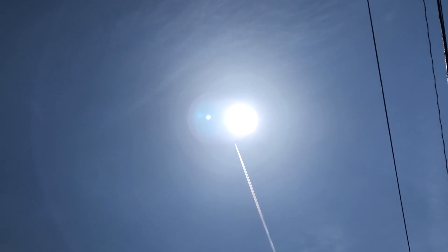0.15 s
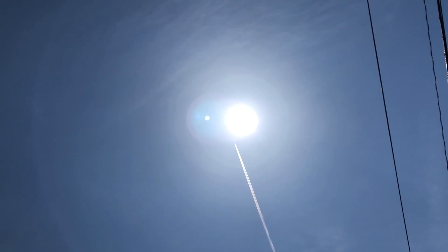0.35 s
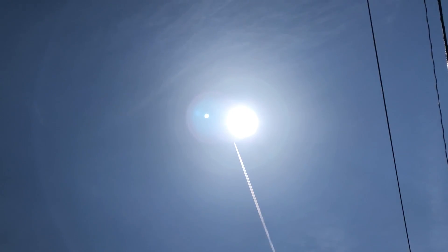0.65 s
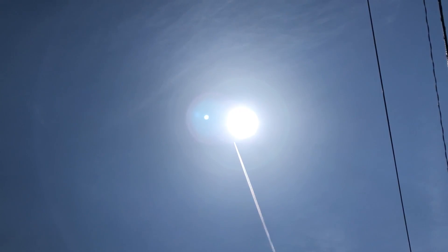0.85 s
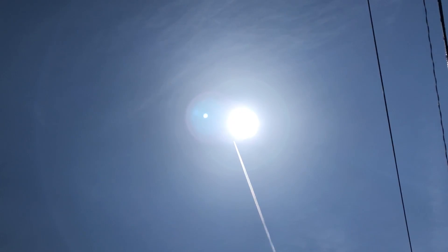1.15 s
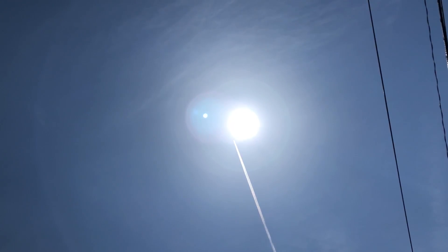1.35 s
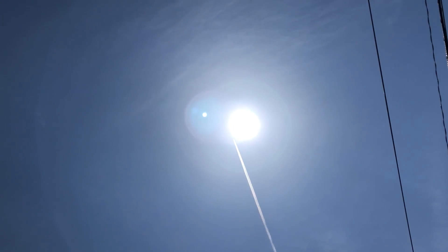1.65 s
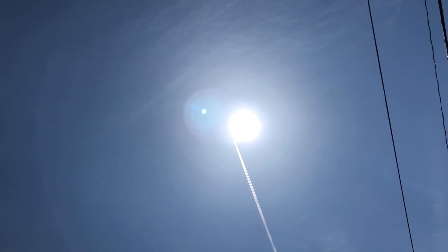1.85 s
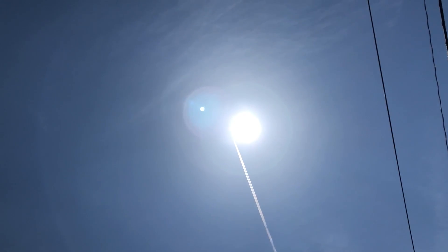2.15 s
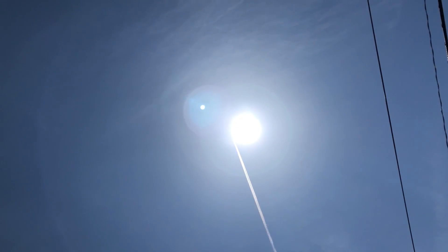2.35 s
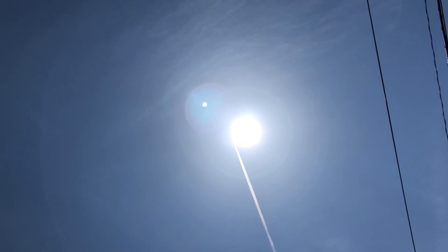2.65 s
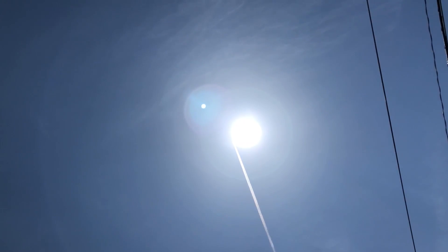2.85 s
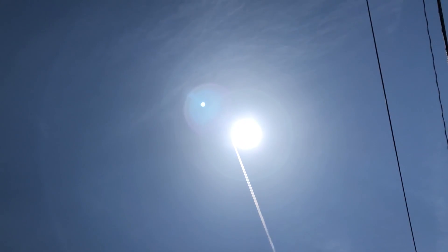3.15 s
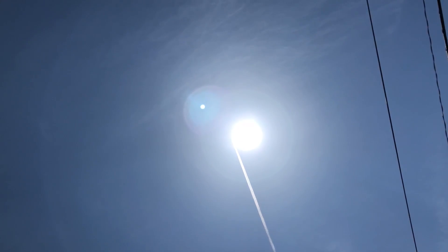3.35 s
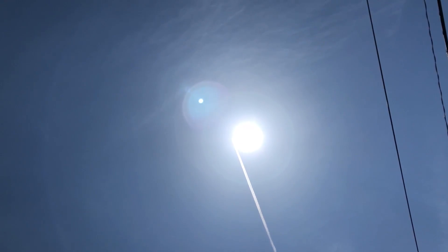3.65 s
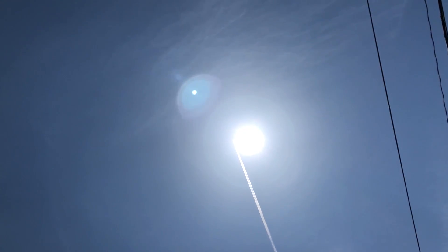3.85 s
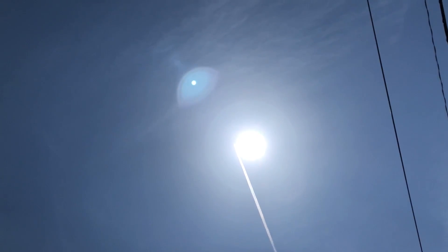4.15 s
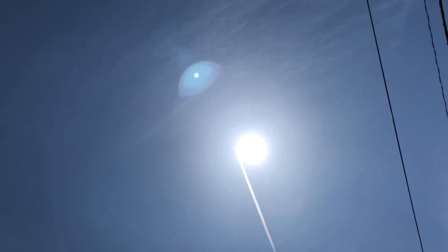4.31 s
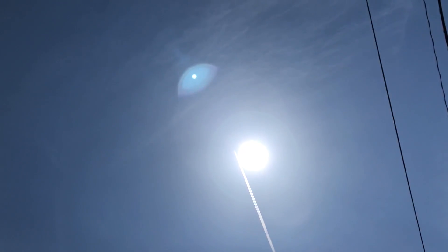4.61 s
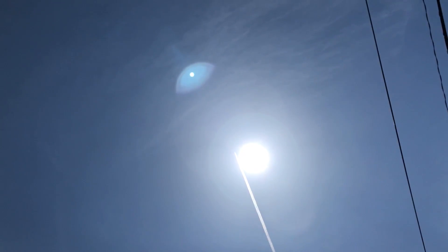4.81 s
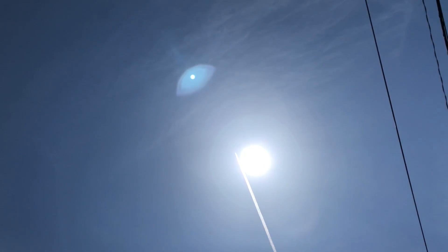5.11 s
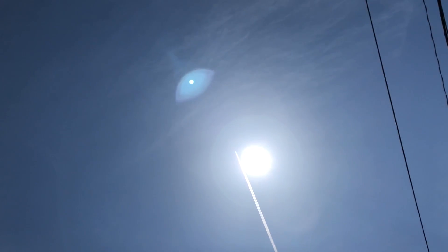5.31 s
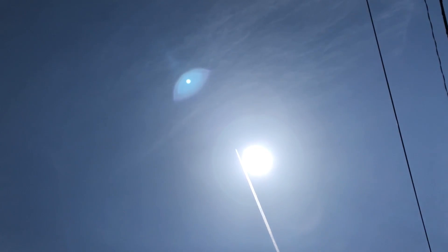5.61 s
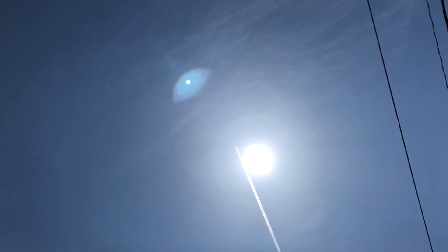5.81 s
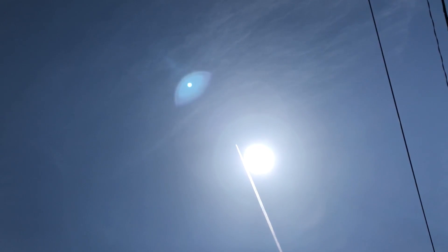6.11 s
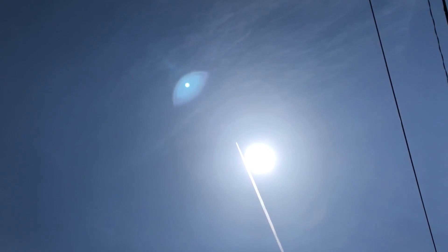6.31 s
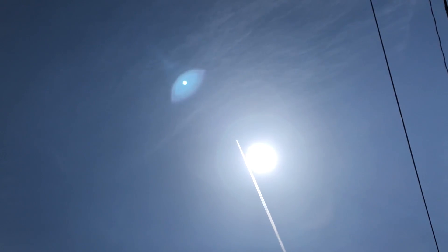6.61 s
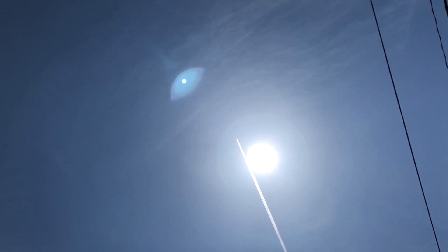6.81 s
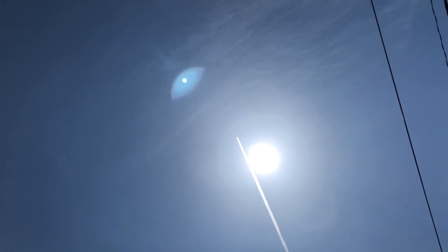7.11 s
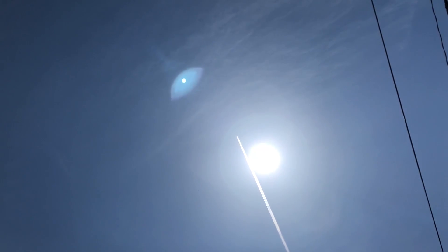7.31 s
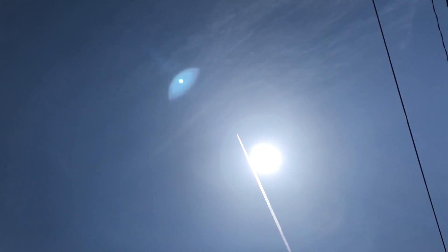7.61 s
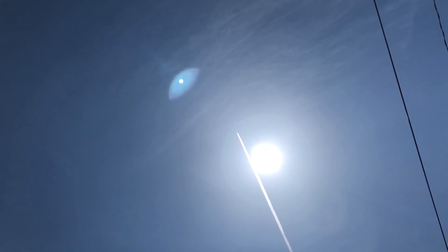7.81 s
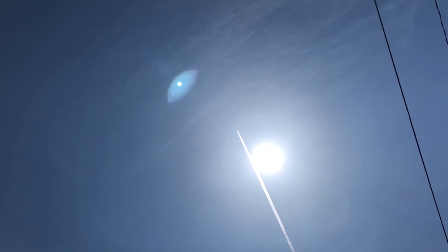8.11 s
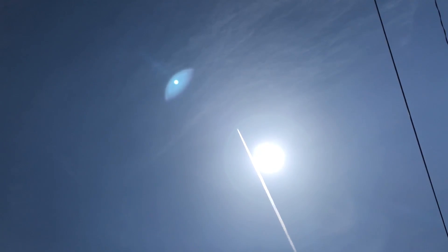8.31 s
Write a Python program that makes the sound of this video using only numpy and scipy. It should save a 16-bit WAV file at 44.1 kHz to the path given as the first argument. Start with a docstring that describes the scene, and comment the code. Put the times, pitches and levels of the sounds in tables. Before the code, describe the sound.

Six spaced raspy alarm barks ring through trees over soft leaf hush, faint bird whistles, and a far engine drone growing louder.

```python
"""Alarm barks among trees

A monkey gives six barks: in each, a tonal squeal with rising pitch breaks into throat-filtered noise, the rasp.
Small birds whistle and twitter on gliding sine tones; trees return bark and song as decaying scattered noise.
A distant engine, a sum of harmonics of its firing rate, speeds up, slackens, then speeds up again and swells.
Filtered noise makes the far murmur, the hush of leaves and the light breeze that nudges the microphone.
"""
import sys
import numpy as np
from scipy import signal
from scipy.fft import rfft, irfft, next_fast_len
from scipy.io import wavfile
from scipy.ndimage import uniform_filter1d, map_coordinates

SR = 44100
rng = np.random.default_rng(int(sys.argv[2]) if len(sys.argv) > 2 else 0)


def dump_mix(stems):
    """Bounce the given channels to the path in sys.argv[1] as a 16-bit WAV at rate SR."""
    frames = np.atleast_2d(stems).T  # one column per channel
    limited = np.clip(frames, -1, 1)  # hard clip at full scale
    pcm = np.round(limited * 32767).astype(np.int16)
    wavfile.write(sys.argv[1], SR, pcm)


N = 373086  # length in samples


def amp(db):
    """Decibels are logarithmic: 20 dB is a factor of ten in amplitude."""
    return 10 ** (np.asarray(db) / 20)


def unit(x):
    """Normalisation to an rms of 1."""
    return x / np.sqrt(np.mean(x ** 2) + 1e-20)


def along(points, hz):
    """Linear interpolation of (hz, value) points on a logarithmic frequency axis."""
    f, v = np.transpose(points)
    return np.interp(np.log(hz + 1), np.log(f + 1), v)


def curves(rows, t):
    """Linear interpolation in time of each column after the first."""
    s, *columns = np.transpose(rows)
    return [np.interp(t, s, column) for column in columns]


def wobble(rate, size):
    """Band-limited random modulation: a spline through rate normal random knots a second."""
    knots = rng.standard_normal(int(size * rate / SR) + 4)
    return map_coordinates(knots, [np.arange(size) * rate / SR])


def filtered(x, response):
    """Linear filtering as multiplication of the spectrum by a response of frequency."""
    m = next_fast_len(len(x) + 8192)
    spectrum = rfft(x, m) * response(np.fft.rfftfreq(m, 1 / SR))
    return irfft(spectrum, m)[:len(x)]


def noise(spectrum):
    """White noise shaped by a spectral density, at an rms of 1."""
    white = rng.standard_normal(N)
    return unit(filtered(white, lambda hz: amp(along(spectrum, hz))))


def phase_of(hz):
    """Phase is the running integral of instantaneous frequency."""
    return 2 * np.pi * np.cumsum(hz) / SR


def add(track, s, sound):
    """Superposition: sound sums into the track from time s on."""
    start = round(s * SR)
    part = sound[max(-start, 0):N - start]
    track[max(start, 0):][:len(part)] += part


def ramp(t, start, length):
    """Linear transition from 0 to 1 over length, beginning at start."""
    return np.clip((t - start) / max(length, 1e-4), 0, 1)


def span(length):
    """Normalised time 0-1 through a note, one value per sample."""
    return np.linspace(0, 1, int(length * SR))


def air(split_hz=950, murmur_db=2, leaves_db=-63.5):
    """Broadband ambience split into bands: a far murmur and the hush of leaves drift slowly in level."""
    # hush spectrum: hz, relative_db_per_hz
    hush_spectrum = [(120, -13.5), (200, 1.5), (293, 1), (327, -3), (393, -3.5), (535, -5.5), (619, -7.5),
                     (942, -7.5), (1110, -7.5), (1220, -8), (2860, -20), (4350, -25.5), (4950, -27.5),
                     (7390, -33.5), (15600, -42.5)]
    # murmur level before the offset murmur_db: time_s, level_db
    murmur_level = [(0, -64.5), (2.3, -62.5), (4.5, -63.5), (5.3, -64), (7.1, -58), (8.46, -60.5)]
    low_db, = curves(murmur_level, np.arange(N) / SR)
    hush = noise(hush_spectrum)
    low = filtered(hush, lambda hz: 1 / (1 + (hz / split_hz) ** 4))
    hiss = filtered(hush, lambda hz: 1 - 1 / (1 + (hz / 4200) ** 4))
    middle = hush - low - hiss
    murmur = amp(low_db + murmur_db + 0.25 * wobble(5.5, N)) * unit(low)
    leaves = amp(leaves_db + 0.46 * wobble(2.9, N)) * unit(middle)
    even_hiss = amp(-75.0) * unit(hiss)  # the finest hiss holds its level
    return murmur + leaves + even_hiss


def breeze(lump_db=2.5, puff_width_s=0.0063):
    """Turbulent pressure at the microphone: low-frequency noise in lumps, with a few short puffs."""
    # mean level of the breeze: time_s, level_db
    breeze_level = [(0, -59.5), (2, -58), (2.7, -60), (5, -64), (6.5, -55.5), (8.46, -52.5)]
    # spectrum of the buffeting: hz, relative_db_per_hz
    buffet_spectrum = [(15, -49), (35, -10.5), (60, 6), (110, 4), (170, 0.5), (260, -22), (450, -34),
                       (900, -76)]
    # soft thumps of air: centre_s, level_db
    thumps = [(.51, -63), (1.01, -68), (1.63, -54), (2.58, -58), (6.3, -51), (6.51, -45), (6.6, -41),
              (7.13, -37.5)]
    t = np.arange(N) / SR
    level_db, = curves(breeze_level, t)
    # each puff has a Gaussian envelope whose standard deviation is puff_width_s
    puffs = sum(amp(db) * np.exp(-.5 * ((t - s) / puff_width_s) ** 2) for s, db in thumps)
    lumps = amp(level_db + lump_db * wobble(11, N))
    return (lumps + puffs) * noise(buffet_spectrum)


def engine(drone_db=-2.0, flutter_db=3.0, wash_db=-33, waver_db=3, count=8):
    """Periodic exhaust pulses as harmonics of the firing rate, each fading on its own, with a faint noise wash."""
    # firing rate, the fundamental: time_s, rate_hz
    firing_rate = [(0, 69), (.5, 69.5), (1, 75), (1.6, 80), (2.15, 83.3), (2.6, 82), (3, 76.5), (3.5, 69.5),
                   (4, 64.5), (4.5, 62), (5, 61), (5.5, 60.8), (5.9, 62.2), (6.4, 66.5), (7, 72.2),
                   (7.5, 77), (8, 82.2), (8.46, 87.3)]
    # fundamental before the offset drone_db: time_s, level_db
    drone_level = [(0.0, -62), (0.12, -56.5), (1.48, -59), (1.51, -48), (2.0, -68), (2.09, -56),
                   (2.54, -59.5), (2.59, -47), (2.9, -60), (3.3, -46.5), (3.37, -54.5), (4.0, -44),
                   (5.14, -65), (5.2, -54), (5.51, -50.5), (5.61, -57), (6.27, -38.5), (6.39, -43.5),
                   (6.5, -36), (7.44, -32), (7.59, -40), (7.66, -32.5), (8.13, -28.5), (8.44, -30),
                   (8.46, -31)]
    # harmonics, the upper ones before the muffler: time_s, second_order_db, upper_orders_db
    exhaust = [(0, -60, -68), (1, -64.5, -70), (2.2, -65.5, -59.5), (3, -67, -78), (3.8, -64.5, -71),
               (4.8, -68, -70.5), (5.8, -65, -71), (6.2, -51, -74), (6.7, -53.5, -78), (7, -47.5, -65),
               (7.6, -48.5, -64), (7.95, -46, -56), (8.2, -54, -56.5), (8.46, -65, -52.5)]
    # muffler's colouring of the upper orders: hz, gain_db
    muffler = [(180, -15), (230, -0.5), (260, -11.5), (300, -17), (380, -8.5), (425, -10), (500, -18.5),
               (600, -13), (800, -34)]
    # spectrum of the wash: hz, relative_db_per_hz
    wash_spectrum = [(200, -37), (450, -15), (750, 1.5), (1300, 6), (2000, -13), (3500, -20), (7000, -47)]
    t = np.arange(N) / SR
    firing, = curves(firing_rate, t)
    base_db, = curves(drone_level, t)
    second_db, upper_db = curves(exhaust, t)
    phase = phase_of(firing * (1 + .003 * wobble(12, N)))

    faintness = (base_db.max() - base_db) / np.ptp(base_db)  # the fainter the drone, the more it wavers
    fundamental = amp(base_db + drone_db + waver_db * faintness * wobble(12, N)) * np.sin(phase)
    second = amp(second_db + wobble(6.3, N)) * np.sin(2 * phase)
    upper = np.zeros(N)
    for k in range(3, count + 1):
        order_db = upper_db + along(muffler, k * firing) + flutter_db * wobble(7, N)
        upper += amp(order_db) * np.sin(k * phase)

    nearness = uniform_filter1d(amp(base_db), SR)  # a 1 s average: the wash follows the slow swell only
    wash = amp(wash_db) * nearness * noise(wash_spectrum)
    return np.sqrt(2) * (fundamental + second + upper) + wash


def note(arch, db, buzz, buzz_hz=190, buzz_depth=0.051, waver=0.0047, fade_s=0.0058,
         flutter_db=2.0, swell_db=3):
    """Frequency modulation of a sine along a pitch arch, loudest in the middle; buzz widens a fast trill."""
    size = len(arch)
    trill = np.sin(phase_of(buzz_hz * (1 + 0.21 * wobble(101, size))))
    pitch = arch * (1 + buzz * buzz_depth * trill + waver * wobble(280, size))
    bulge = np.sin(np.linspace(0, np.pi, size)) - .5
    swell = amp(db + swell_db * bulge + flutter_db * wobble(74, size))
    edges = signal.windows.tukey(size, min(1, 2 * fade_s * SR / size))
    return np.sqrt(2) * swell * edges * np.sin(phase_of(pitch))


def ease(u):
    """Sinusoidal easing: 0 to 1 with zero slope at both ends."""
    return np.sin(np.pi / 2 * u) ** 2


def twitters(chip_buzz=0.56):
    """Rapid descending glides: each twitter is three overlapping chips stepping down in pitch."""
    # twitters: start_s, level_db
    calls = [(.12, -57), (.249, -58), (5.692, -60), (5.817, -62.5)]
    # chips of every twitter: delay_s, length_s, start_hz, end_hz, level_re_twitter_db
    chips = [(0, .032, 8050, 7200, -11.5), (0.017, .027, 5270, 4440, -4.5), (0.046, .03, 4200, 3400, -0.5)]
    out = np.zeros(N)
    for s, db in calls:
        for delay, length, first, last, chip_db in chips:
            glide = first + (last - first) * span(length)
            add(out, s + delay, note(glide, db + chip_db, chip_buzz))
    return out


def buzzy_falls(trill_width=1.17):
    """Fast frequency modulation heard as a buzz, on a pitch that flicks up and then falls; it closes each song."""
    # falls: start_s, length_s, top_hz, level_db (at the start of the loss)
    falls = [(0.368, 0.19, 5170, -58.5), (2.437, 0.19, 5970, -73), (5.941, .185, 5250, -61)]
    rise_s, start_ratio = .016, .72  # upward flick: its length, start pitch over top pitch
    fall_ratio, fade_db = .57, 6  # end pitch over top pitch, loss on the way down
    out = np.zeros(N)
    for s, length, top, db in falls:
        u = span(length)
        flick = start_ratio + (1 - start_ratio) * ramp(u * length, 0, rise_s)
        fall = 1 - (1 - fall_ratio) * ease(u ** 1.15)
        add(out, s, note(top * flick * fall, db - fade_db * u, trill_width))
    return out


def whistles(whistle_buzz=.12):
    """Near-pure tones with gliding frequency: each slows into a turning pitch and eases away from it."""
    # whistles: start_s, length_s, start_hz, turning_hz, end_hz, share_before_turn (0-1), level_db
    calls = [(-.012, .08, 4970, 3870, 3880, .98, -52), (0.745, 0.056, 6400, 4800, 4830, 0.85, -68.5),
             (0.86, 0.055, 6550, 4710, 4800, 0.86, -69), (.956, .039, 3450, 3450, 2880, 0.2, -70),
             (.998, 0.02, 4950, 4900, 4350, 0.1, -72), (1.058, .028, 3520, 3480, 2920, .15, -72),
             (2.304, 0.15, 6170, 7350, 6200, 0.66, -80), (2.855, 0.11, 5200, 6900, 7000, .85, -80),
             (3.069, 0.061, 3700, 4380, 4020, .6, -71.5), (3.727, .096, 6460, 6300, 5600, 0.36, -83),
             (3.831, 0.092, 4100, 5140, 4480, 0.35, -71.5), (4.28, .08, 4100, 4260, 4270, .8, -79),
             (4.832, .084, 6260, 6100, 5780, .3, -79), (4.975, 0.081, 3480, 4290, 3700, 0.6, -57.5),
             (5.236, .045, 5100, 4040, 4000, 0.8, -59), (5.294, .128, 3500, 4890, 4944, 0.3, -56.5),
             (5.503, 0.13, 4200, 4830, 3900, 0.3, -56), (6.565, .06, 5950, 6050, 5600, .4, -81),
             (6.618, 0.073, 5600, 4320, 5100, .45, -74), (6.69, 0.11, 4650, 4600, 3900, 0.05, -80),
             (6.725, .055, 4400, 5100, 4930, .6, -77), (7.186, 0.095, 3600, 4480, 4430, 0.8, -71.5),
             (7.482, .045, 4540, 4950, 4600, .5, -80), (7.79, 0.063, 2200, 2730, 2750, 0.7, -64.5)]
    out = np.zeros(N)
    for s, length, first, turn, last, share, db in calls:
        u = span(length)
        approach = (first - turn) * (1 - ramp(u, 0, share)) ** 2
        departure = (last - turn) * ease(ramp(u, share, 1 - share))
        add(out, s, note(turn + approach + departure, db, whistle_buzz))
    return out


def birds():
    """Superposition of independent voices: stepped twitters, long buzzy falls and gliding whistles."""
    return twitters() + buzzy_falls() + whistles()


def woods(x, colour, build_s=0.0061):
    """Multiple scattering by trunks and leaves: convolution with a coloured tail that builds up and dies away."""
    # reverberation among the trees: hz, t60_s
    decay = [(500, 1), (1300, 1), (2500, 1), (5000, 0.85), (9000, 0.46)]
    hz, t, z = signal.stft(rng.standard_normal(SR), SR, nperseg=256)
    die_away = amp(-60 * t / along(decay, hz)[:, None])
    build_up = 1 - np.exp(-t / build_s)
    tail = signal.istft(z * die_away * build_up, SR, nperseg=256)[1]
    echo = signal.fftconvolve(x, tail / np.linalg.norm(tail))[:N]
    return filtered(echo, lambda f: amp(along(colour, f)))


def rasp(size, opening, tuning, flap_hz=270, scatter=0.321, depth=0.23, closing=0.0805):
    """Source and filter: chaotic folds chop noisy air, whose puffs ring in throat resonances that sink."""
    # throat resonances before mouth and tuning: centre_hz, width_hz, level_db
    resonances = [(1476, 1030, 2), (2285, 900, -1), (3610, 730, -11), (4490, 650, -12)]
    # overall colour of the rasp before tuning: hz, gain_db
    rasp_band = [(450, -56), (750, -12), (1000, 6.5), (1800, 2.5), (2650, -3), (3050, 0), (3600, -3.5),
                 (4750, -1.5), (5300, -5), (7000, -26)]
    flap_rate = flap_hz * np.exp(scatter * wobble(300.0, 2 * size))
    flaps = 1 + np.clip(depth, 0, 1) * np.cos(phase_of(flap_rate))

    def throat(f):
        """Resonances add in power."""
        power = 0
        for (hz, width, db), extra_db in zip(resonances, [0, *opening]):
            power = power + amp(db + extra_db) ** 2 / (1 + (2 * (f - hz) / width) ** 2) ** 2
        return np.sqrt(power)

    chopped = flaps * rng.standard_normal(2 * size)
    puffs = unit(filtered(chopped, lambda f: throat(f) * amp(along(rasp_band, f))))
    # reading the puffs at a falling speed lowers every frequency as the mouth closes
    speed = tuning * (1 + closing * np.linspace(.5, -.5, size))
    return map_coordinates(puffs, [np.cumsum(speed)])


def monkey(clean_jitter=0.0057, rough_jitter=.05, waver=.003, overtone_loss_db=24):
    """Voice passing from periodic to chaotic: pitch shakes and overtones dissolve as rasp takes over; both sink."""
    # barks: start_s, squeal_s, pause_s, rasp_s, start_hz, top_hz, share of the rasp with pitch held (0-1),
    # squeal_peak_db, rasp_db, tone_under_rasp_db, closing_tone_db
    barks = [(1.207, 0.047, 0.0019, 0.16, 1087, 1308, 0.43, -42, -42.5, -53.5, -43),
             (2.177, .031, 0.002, .187, 1104, 1261, .36, -43, -46, -50.5, -55),
             (3.912, 0.0232, 0.00096, .197, 1196, 1232, .16, -40, -41.5, -47, -56),
             (4.92, 0.01, 0.0158, 0.19, 1080, 1144, 0.6, -47, -41, -68, -56),
             (5.741, .051, 0.00081, .18, 1031, 1244, .48, -41.5, -46.5, -46, -53.5),
             (7.857, .064, 0, 0.14, 1032, 1298, 0.53, -43.5, -41.5, -42.5, -52)]
    # mouth shape of each bark: second_harmonic_db, third_harmonic_db, middle_resonance_db,
    # third_resonance_db, top_resonance_db (all added to the throat's), tuning_ratio
    mouths = [(-10, -10.5, -1, 4, -6, .97), (-20, -20, -6, 0.5, -11, .98), (-5, -29, 1, 2, 2, 1.0),
              (-9.5, -21, -2.5, -0.5, -3.5, 1.03), (-17, -14, 2, 6, 5.5, .99),
              (-3.5, -10.5, 6.5, 5, -2, .96)]
    swell_db_per_s, linger_s = 133, 0.0096  # squeal grows until it breaks; its tone lasts into the rasp
    squeal_attack = 0.23  # share of the squeal: the long ones start softly
    rasp_attack_s, release_s = 0.0043, 0.019
    rasp_hold, rasp_fade_db = 0.39, 11.5  # share of the rasp at full force, loss by its end
    sink_s, sunk_hz, last_hz = 0.046, 1058, 971  # the pitch sinks, then droops on
    out = np.zeros(N)
    for bark, (second_db, third_db, *opening, tuning) in zip(barks, mouths):
        (s, squeal_s, pause_s, rasp_s, start_hz, top_hz, held,
         squeal_db, rasp_db, under_db, closing_db) = bark
        crack = squeal_s + pause_s
        end, sinking = crack + rasp_s, crack + held * rasp_s
        t = np.arange(0, end, 1 / SR)
        rise = ramp(t, 0, squeal_s)
        broken = ramp(t, crack, rasp_attack_s)
        sunk = ramp(t, sinking, sink_s)
        drooped = ramp(t, sinking + sink_s, sink_s)
        pitch = start_hz + (top_hz - start_hz) * rise
        pitch = pitch + (sunk_hz - top_hz) * sunk + (last_hz - sunk_hz) * drooped

        swell = amp(squeal_db - swell_db_per_s * squeal_s * (1 - rise))
        attack = ramp(t, 0, squeal_attack * squeal_s)
        opening_tone = swell * attack * (1 - ramp(t, squeal_s, linger_s))
        under_tone = broken * amp(under_db + (closing_db - under_db) * sunk)
        tone = np.maximum(opening_tone, under_tone)

        fading = ramp(t, crack + rasp_hold * rasp_s, (1 - rasp_hold) * rasp_s)
        force = broken * amp(rasp_db - rasp_fade_db * fading)
        chaos = force / (force + tone + 1e-9)  # share of the rasp in the voice
        jitter = (clean_jitter + rough_jitter * chaos ** 2) * wobble(304.3, len(t))
        phase = phase_of(pitch * (1 + jitter + waver * wobble(70.8, len(t))))

        # overtones once lost do not return within the bark
        kept = amp(-overtone_loss_db * np.maximum.accumulate(chaos))
        overtones = amp(second_db) * np.sin(2 * phase) + amp(third_db) * np.sin(3 * phase)
        squeal = np.sqrt(2) * tone * (np.sin(phase) + kept * overtones)
        voice = squeal + force * rasp(len(t), opening, tuning)
        add(out, s, voice * ramp(end - t, 0, release_s))
    return out


def scene():
    """Superposition of open air, engine, song and barks, the last two with their scattered echoes."""
    # leaves throw back the shrillest notes best: hz, gain_db
    song_echo = [(3500, -13.5), (5000, -8), (6500, -2), (7700, -3)]
    # what the trees return of a bark: hz, gain_db
    bark_echo = [(800, 3), (1050, -16.5), (1310, -8), (1550, -13), (2400, -5.5), (3500, -6), (5000, -8.5)]
    barks, song = monkey(), birds()
    background = air() + breeze() + engine()
    singing = song + woods(song, song_echo)
    barking = barks + woods(barks, bark_echo)
    return (background + singing + barking)[None]


def record(dry, top_hz=15750):
    """Band limitation: the recorder keeps nothing at or above top_hz."""
    return filtered(dry[0], lambda hz: hz < top_hz)[None]


dry = scene()
out = record(dry)
dump_mix(out)
```